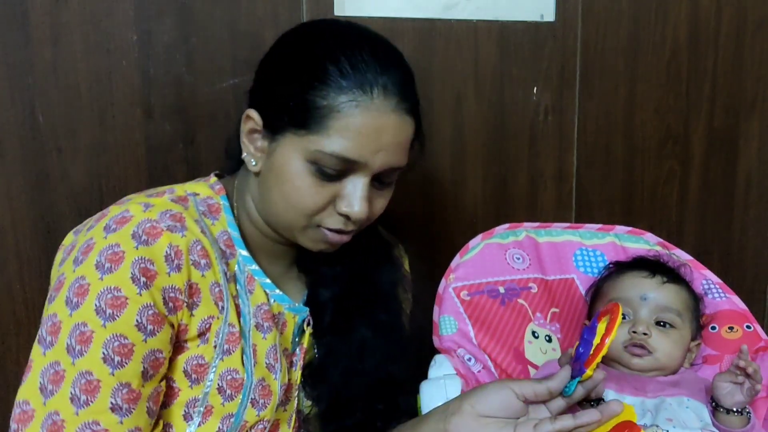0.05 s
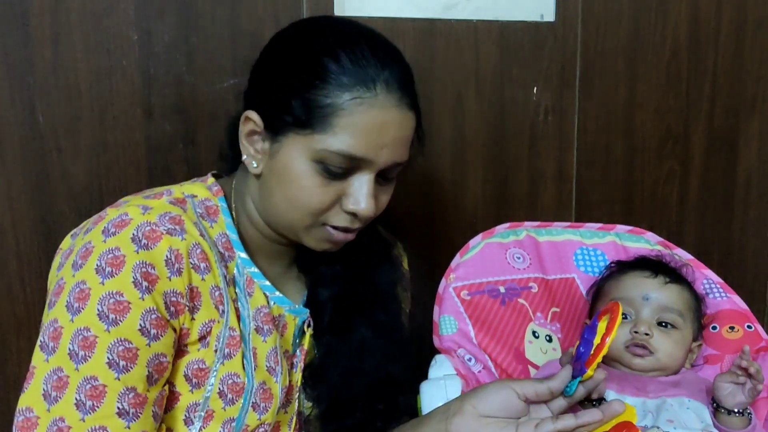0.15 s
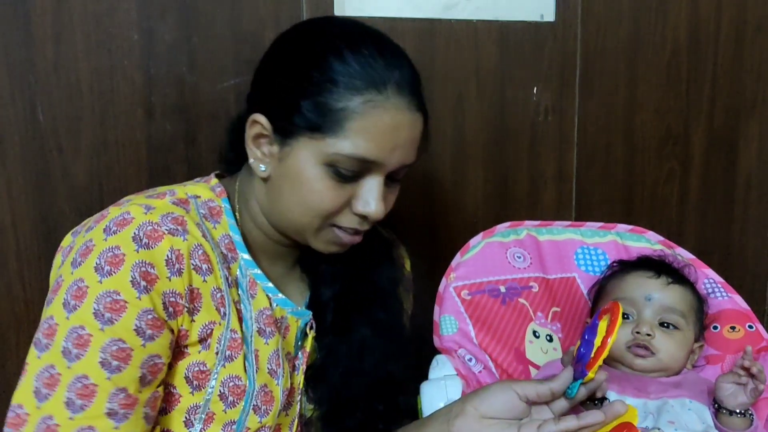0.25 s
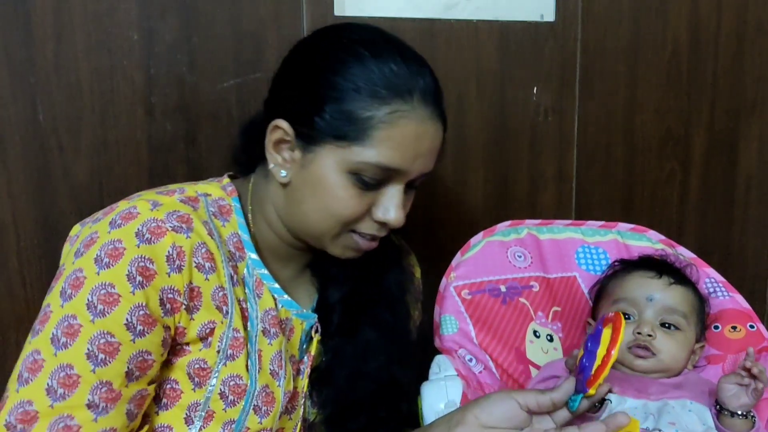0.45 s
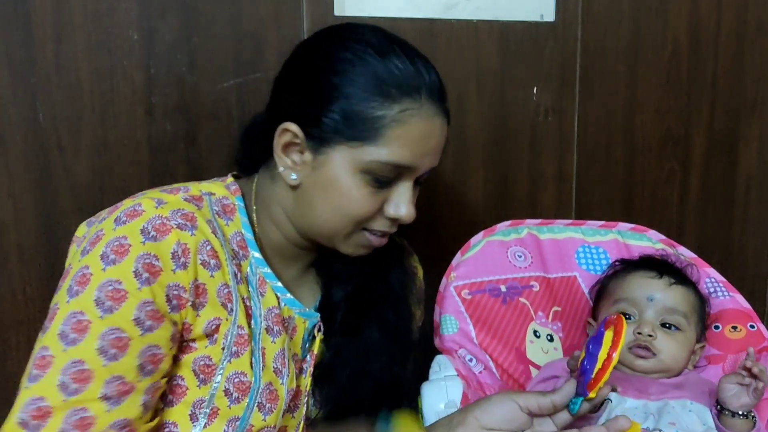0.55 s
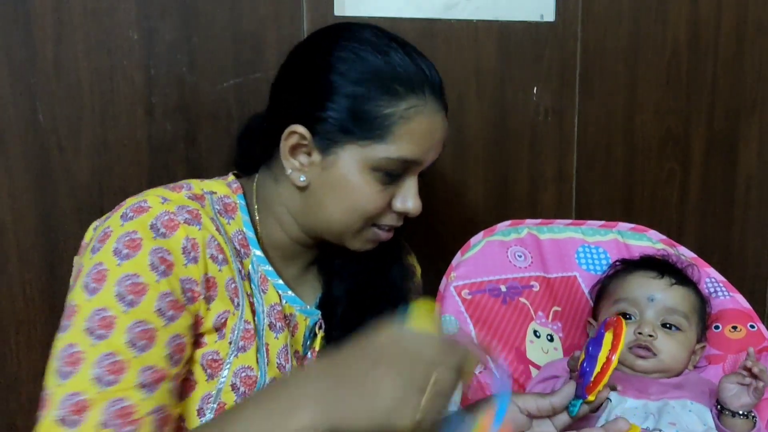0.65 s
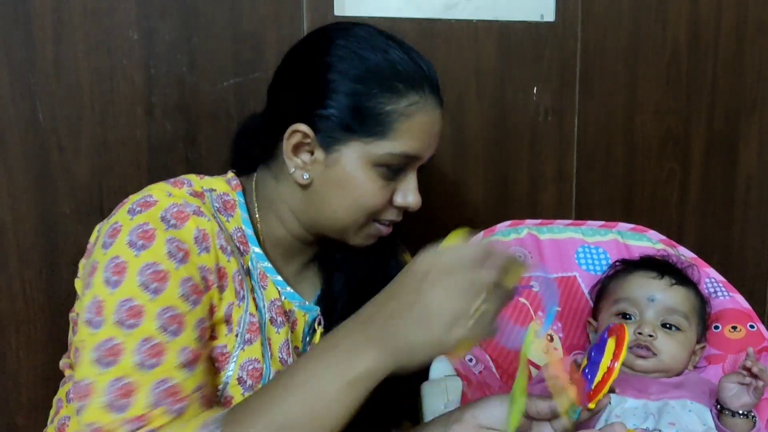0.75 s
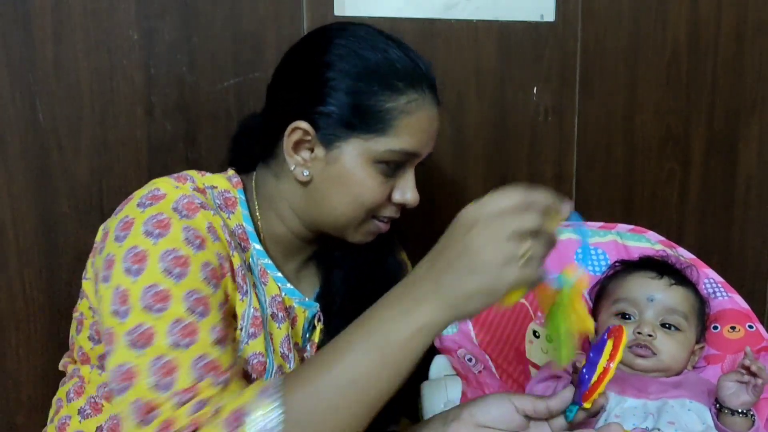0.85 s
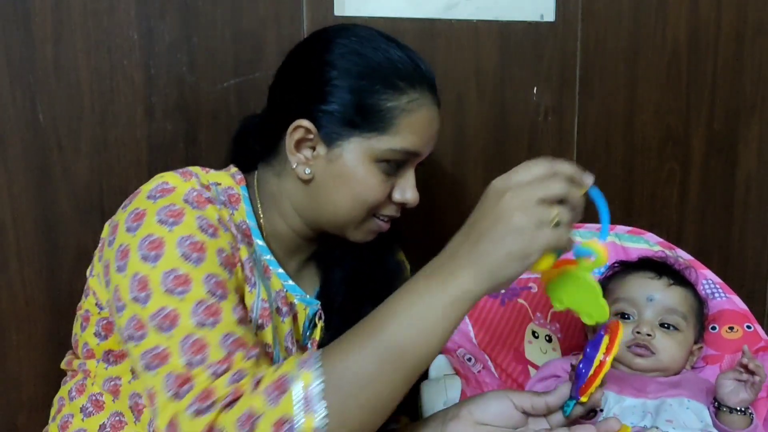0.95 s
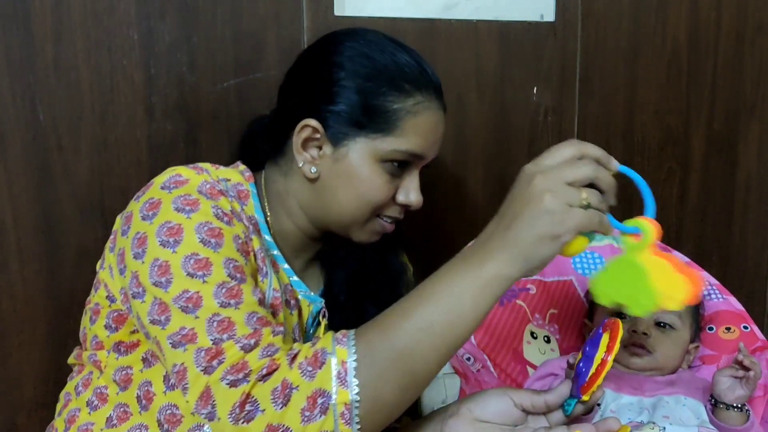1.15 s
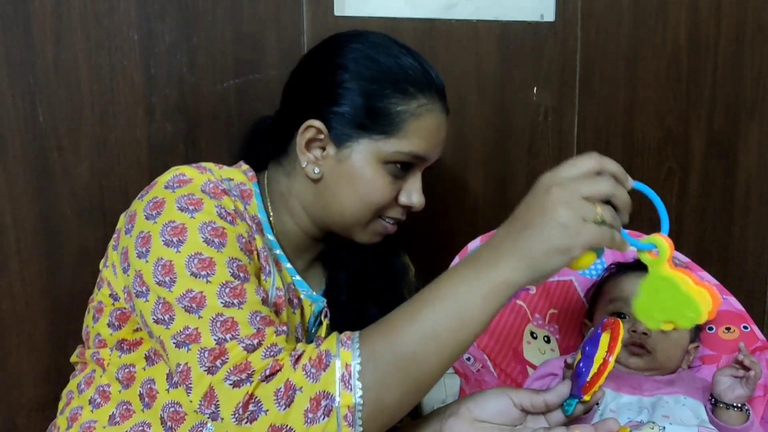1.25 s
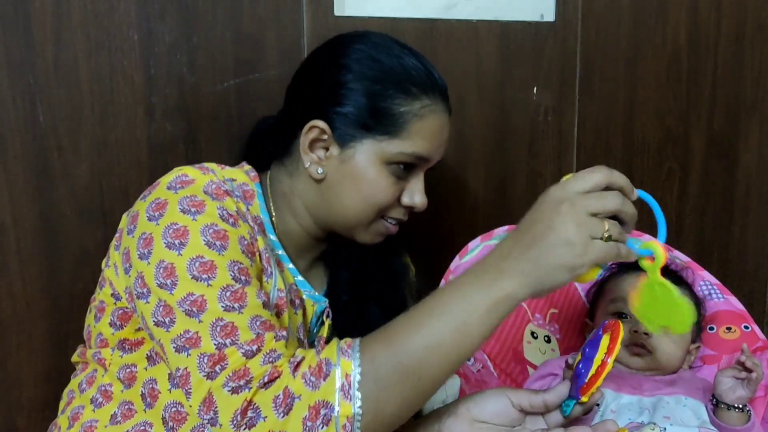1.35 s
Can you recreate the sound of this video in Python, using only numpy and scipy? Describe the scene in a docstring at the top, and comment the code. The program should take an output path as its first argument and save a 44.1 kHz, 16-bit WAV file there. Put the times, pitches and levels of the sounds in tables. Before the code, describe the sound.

Plastic toy keys on a ring are shaken, clacking together over a faint sleeve rustle.

```python
"""A faint steady hum fills a small panelled room, and a sleeve starts to rustle as a baby's rattle,
plastic keys on a ring, is lifted. The keys touch lightly, then are shaken in three bursts.
In the first two they slide and clack against each other; in the third they swing back and knock on
the ring, then settle with two tiny touches. Each hit makes the plastic ring for a moment,
a near wall echoes it and the room rings on."""
import sys
import numpy as np
from scipy import signal
from scipy.fft import rfft, irfft
from scipy.io import wavfile

SR = 44100
rng = np.random.default_rng(int(sys.argv[2]) if len(sys.argv) > 2 else 0)


def wav_out(sig):
    """Save sig, one row per channel (or a flat mono array), as 16-bit PCM at SR to the path in sys.argv[1]."""
    wavfile.write(sys.argv[1], SR, np.round(np.clip(np.atleast_2d(sig).T, -1, 1) * 32767).astype(np.int16))


N = 61739

# Levels are relative. A ring time is how long a sound takes to fade by 60 dB.
# tones of the hum: f/Hz, level/dB
HUM_TONES = [(429, -54.5), (284, -69)]
# tone colour of the still room air: f/Hz, level/dB
AIR_COLOUR = [(25, -16.5), (50, -11.5), (70, -6), (110, -2.5), (180, -4), (290, 5), (500, -7), (800, -3.5),
              (1500, -20), (3000, -31.5), (6000, -30), (10000, -34.5), (15000, -35.5)]
# loudness of the sleeve's rustle: t/s, level/dB
SLEEVE_LEVEL = [(0, -60.5), (.15, -53), (.28, -42.5), (.41, -38.5), (.47, -50), (.52, -40), (.57, -50.5),
                (.68, -45.5), (.79, -48), (.9, -54.5), (1.01, -54.5), (1.06, -43), (1.16, -47.5),
                (1.25, -54), (1.35, -65), (1.39, -55.5)]
# tone colour of the rustle: f/Hz, level/dB
SLEEVE_COLOUR = [(40, -22), (100, -15.5), (180, -1), (290, -0.5), (420, 0), (600, -3), (1000, -7.5),
                 (2000, -11), (6000, -22), (15000, -51.5)]
# loudness of a low hollow sound stirred by the movement: t/s, level/dB
HOLLOW_LEVEL = [(.1, -65), (.27, -42.5), (.42, -48.5), (.5, -46.5), (.62, -73), (.72, -57), (.80, -44.5),
                (.88, -71), (1.02, -58.5), (1.15, -53), (1.33, -79.5), (1.39, -52)]
# tone colour of the hollow sound: f/Hz, level/dB
HOLLOW_COLOUR = [(150, -21), (245, -13.5), (280, 5.5), (315, -12), (500, -36.5)]
# light touches of the keys: t/s, level/dB, f/Hz, ring time/s
TOUCHES = [(0.101, -37, 5050, .25), (0.124, -36, 7384, 0.017), (0.854, -30, 2450, 0.011),
           (0.925, -38.5, 3160, 0.079), (1.379, -35.5, 5600, .004), (1.387, -41.5, 5800, 0.0032)]
# natural tones of a key's flat face: f/Hz, level/dB, ring time/s
FACE_TONES = [(4277, 1.5, 0.013), (4420, 0, 0.007), (6086, 1.5, 0.019), (6445, 5, 0.0062), (6986, -1, .012),
              (7390, -2, 0.02)]
# gaps where the face hardly sounds: f/Hz, width/Hz
FACE_GAPS = [(3650, 440), (5370, 230)]
# natural tones of a key's edge: f/Hz, level/dB, ring time/s
EDGE_TONES = [(8580, 3, 0.0055), (8900, 5.5, 0.012), (9790, 9, 0.0057), (10850, -9, 0.0039),
              (11700, -2.5, 0.0061), (13370, -2.5, 0.0072), (14370, -12.5, 0.0084)]
# how long the room rings: f/Hz, ring time/s
ROOM_RING_TIMES = [(500, 0.22), (2500, 0.3), (6500, 0.28), (10000, 0.26), (15000, 0.19)]
# loudness of keys sliding over each other: t/s, level/dB
SLIDING_LEVEL = [(.09, -96), (.125, -50), (.17, -85), (.22, -40.5), (.30, -34), (.40, -32.5), (.46, -63),
                 (.50, -36.5), (0.539, -32), (0.609, -31.5), (.645, -25.5), (.68, -28), (.755, -38.5),
                 (.79, -85), (.91, -53.5), (.99, -62.5), (1.116, -41.5), (1.14, -60), (1.25, -81.5)]
# loudness of one key kept ringing by the sliding: t/s, level/dB
RINGING_LEVEL = [(.23, -90), (.28, -49), (.48, -65.5), (.54, -35), (.60, -37), (.70, -37), (.76, -44.5),
                 (.80, -90)]
# key against key: t/s, bending f/Hz, bending level/dB, face level/dB, edge level/dB,
# wall echo level/dB, direct sound level/dB
CLACKS = [(0.1877, 5440, -30, -25.5, -34, -7, 2), (0.2135, 2560, -12.5, -13, -7, -9.5, 0),
          (0.2317, 2527, -10.5, -11.5, -4, -6.5, -1), (0.2554, 2510, -14, -7, -1, -11, -3),
          (0.2721, 4390, -14, -4.5, -13.5, -22, 2.5), (0.2958, 4410, -14, -2, -5.5, -1.5, 2),
          (0.3068, 4170, -8, -11, -17, -0.5, -2.5), (0.3119, 1850, -17.5, -1, -18, -2.5, 1.5),
          (0.3398, 2380, -9, -11.5, -6.5, -12, -8.5), (0.3637, 2555, -13.5, -5.5, -8, -11, 0),
          (0.3705, 2935, -9, -8.5, -8.5, -21, 0.5), (0.406, 1946, -18.5, -18.5, -18, -3.5, 0.5),
          (0.4403, 4390, -39, -21.5, -22.5, -1, 6), (0.5032, 2040, -13, -7.5, -14, -3, 6),
          (0.5247, 4433, -1, -4.5, -4, -21.5, 1.5), (0.5325, 4480, -6.5, -15, 1, -16, -1),
          (0.592, 1680, -13.5, -7.5, -7.5, -16.5, -1.5), (0.5918, 3267, -12.5, -22, -12.5, -7, -1.5),
          (0.6047, 1570, -15.5, -1.5, -19, -9.5, 2.5), (0.6126, 2940, -13.5, -4.5, -7.5, -18, 2.5),
          (0.6816, 2120, -15.5, -5.5, -9, -19, 5.5), (0.6818, 3140, -13, -20, -16, -18, 3.5),
          (0.683, 4350, -7, -15, 0, -18, 4), (1.0962, 7450, -9.5, -15, -18, -5.5, 0.5)]
# loudness of the keys jostling on the ring: t/s, level/dB
JOSTLE_LEVEL = [(1.015, -110), (1.035, -32), (1.085, -37.5), (1.12, -48), (1.17, -100)]
# keys swinging back on the ring: t/s, level/dB, treble lift/(dB per octave)
KNOCKS = [(1.0263, -7, 7.5), (1.034, -10.5, 10), (1.038, -4.5, -11), (1.041, -0.5, -1.5), (1.051, -12, -14),
          (1.071, -3.5, -1), (1.087, -17.5, -3)]
# natural tones of the ring with the keys hanging on it: f/Hz, level/dB, ring time/s
RING_TONES = [(1840, -3.5, 0.022), (2123, -4, .012), (2354, -4.5, 0.015), (2920, -1, 0.015),
              (3850, -2.5, .011), (4400, -4.5, 0.023), (5000, 0, 0.0061), (6180, 0.5, 0.013),
              (7270, -3.5, 0.012), (8900, -8, .0041), (10700, -17, 0.01)]

RATTLE_DB, KNOCK_DB, AIR_DB = 4, -0.5, -56.5
BEND_RING_S, BEND_SPACING, BEND_WIDTH_HZ = 0.012, 0.062, 1170
SNAP_DB, SNAP_RING_S = -7, 0.009
WALL_DELAY_S, ROOM_DB, ROOM_GAP_S, ROOM_BUILD_S = 0.0073, -3.5, 0.0026, 0.0045
TICKS_PER_S, TICK_SCATTER_DB = 1300, 3


def gain(db):
    """Turn decibels into a number to multiply by."""
    return 10 ** (np.asarray(db) / 20)


def unit(x):
    """Scale a sound so that its energy is 1."""
    return x / np.sqrt(np.sum(x ** 2))


def fade(t, ring_s):
    """A smooth fade, 60 dB down after ring_s."""
    return np.exp(-np.log(1000) * t / max(ring_s, 1e-4))


def loudness(curve):
    """Join (t/s, level/dB) points into one gain per sample."""
    return gain(np.interp(np.arange(N) / SR, *np.array(curve).T))


def add(out, at, x):
    """Mix x into out, starting at a time in seconds."""
    i = int(np.clip(at * SR, 0, N - 1))
    out[i:i + len(x)] += x[:N - i]


def filtered(x, kind, hz, order):
    """Keep what is above hz ("high"), keep a band ("band") or remove one ("stop")."""
    return signal.sosfilt(signal.butter(order, hz, kind, fs=SR, output="sos"), x)


def noise(colour):
    """Steady noise with a tone colour of (f/Hz, level/dB) points."""
    hz, db = np.array(colour).T
    f = np.maximum(np.arange(N // 2 + 1) * SR / N, 1)
    shape = gain(np.interp(np.log(f), np.log(hz), db))
    x = irfft(rfft(rng.standard_normal(N)) * shape, N)
    return x / x.std()


def background():
    """A sleeve rustles and a hollow sound swells and fades, over a steady hum and room air."""
    t = np.arange(N) / SR
    sleeve = noise(SLEEVE_COLOUR) * loudness(SLEEVE_LEVEL)
    hollow = noise(HOLLOW_COLOUR) * loudness(HOLLOW_LEVEL)
    hum = sum(np.sqrt(2) * gain(db) * np.sin(2 * np.pi * (hz * t + rng.random())) for hz, db in HUM_TONES)
    return sleeve + hollow + hum + gain(AIR_DB) * noise(AIR_COLOUR)


def touches():
    """Keys touch lightly: one fading tone on top of a small click."""
    out = np.zeros(N)
    for at, db, hz, ring_s in TOUCHES:
        touch = strike([(hz, 0, ring_s)], scatter=0, size=8192)
        click = gain(0.5) * key_bend(hz) + gain(-2.5) * key_face() + gain(-25) * strike(EDGE_TONES)
        add(touch, 0, click)
        add(out, at, room(gain(db) * touch))
    return out


def strike(tones, lift_db=0, scatter=0.024908, size=2048):
    """Struck plastic rings briefly at its natural tones; scatter shifts their pitch at each hit."""
    t = np.arange(size) / SR
    lowest_hz = tones[0][0]
    out = 0
    for (hz, db, ring_s), (detune, phase) in zip(tones, rng.standard_normal((len(tones), 2))):
        tone = np.sin(2 * np.pi * (hz * (1 + scatter * detune) * t + phase)) * fade(t, ring_s)
        out = out + unit(tone) * gain(db + lift_db * np.log2(hz / lowest_hz))
    return unit(filtered(out, "high", 0.78 * lowest_hz, order=6))  # little sound below the lowest tone


def key_bend(hz):
    """A key bends to and fro, giving five close tones in a narrow band around hz."""
    tones = [(hz * (1 + k * BEND_SPACING), 0, BEND_RING_S) for k in range(-2, 3)]
    band = [hz - BEND_WIDTH_HZ / 2, hz + BEND_WIDTH_HZ / 2]
    return unit(filtered(strike(tones, scatter=0.013), "band", band, order=6))


def key_face():
    """The flat of a key snaps and rings, with deep gaps between its groups of tones."""
    x = strike(FACE_TONES, lift_db=5.5) + snap(low_hz=4000)
    for hz, width in FACE_GAPS:
        x = filtered(x, "stop", [hz - width / 2, hz + width / 2], order=2)
    return unit(x)


def snap(low_hz, size=2048):
    """The contact itself: a very short burst of noise, weak below low_hz."""
    burst = rng.standard_normal(size) * fade(np.arange(size) / SR, SNAP_RING_S)
    return gain(SNAP_DB) * unit(filtered(burst, "high", low_hz, order=8))


def room(x, wall_db=-10, direct_db=0, size=16384):
    """Direct sound, a wall echo and a fading tail, which is new each time because the toy moves."""
    t = np.arange(size) / SR
    f = np.arange(size // 2 + 1) * SR / size
    hz, ring_times = np.array(ROOM_RING_TIMES).T
    white = rfft(rng.standard_normal(size))
    tail = 0
    for share, ring_s in zip(np.eye(len(hz)), ring_times):  # each band fades at its own speed
        band = irfft(white * np.interp(f, hz, share), size)
        tail = tail + band * fade(t, ring_s)
    build_up = np.clip((t - ROOM_GAP_S) / ROOM_BUILD_S, 0, 1)
    echoes = gain(ROOM_DB) * unit(tail * build_up)
    echoes[0] += gain(direct_db)
    echoes[int(WALL_DELAY_S * SR)] += gain(wall_db)
    return signal.fftconvolve(x, echoes)[:N]


def chatter():
    """Sliding keys tick on their faces, keep one key ringing, and later jostle on the ring."""
    sliding = ticking(SLIDING_LEVEL,
                      lambda: unit(key_face() + gain(-8.5) * strike(EDGE_TONES) + snap(low_hz=2750)))
    ringing = ticking(RINGING_LEVEL, lambda: key_bend(hz=4433))
    jostling = ticking(JOSTLE_LEVEL, ring_hit)
    return sliding + ringing + jostling


def ticking(curve, make_tick, spots=10):
    """Many tiny ticks at random times, from several contact spots, following a loudness curve."""
    level = loudness(curve)
    out, chance = 0, TICKS_PER_S / SR
    for _ in range(spots):
        hits = rng.random(N) < chance / spots
        strength = gain(TICK_SCATTER_DB * rng.standard_normal(N))
        out = out + signal.fftconvolve(hits * strength * level, room(make_tick()))[:N]
    return out / np.sqrt(chance)


def clacks():
    """Key hits key: it bends and snaps, and its face and edge ring."""
    out = np.zeros(N)
    for at, hz, bend_db, face_db, edge_db, wall_db, direct_db in CLACKS:
        snap_boost_db = 10 + 0.72 * face_db  # harder blows snap more
        clack = gain(bend_db) * (key_bend(hz) + gain(snap_boost_db) * snap(0.68 * hz))
        clack += gain(face_db) * key_face() + gain(edge_db) * strike(EDGE_TONES)
        loose = np.clip(-face_db / 16, 0, 1)  # lighter clacks skid more
        add(out, at, room(skid(clack, span_s=0.0013, loose=loose), wall_db, direct_db))
    return out


def skid(x, span_s, loose=1, repeats=4):
    """A loose contact: one firm hit, then several weaker ones right after it."""
    out = np.concatenate([x, np.zeros(len(x))])
    for delay, strength in rng.random((repeats, 2)):
        add(out, delay * span_s, loose * strength * x)
    return unit(out) * np.linalg.norm(x)


def ring_hit(lift_db=0):
    """A hanging key meets the ring: the ring's tones and a snap."""
    return strike(RING_TONES, lift_db, scatter=0.046) + gain(0.5) * snap(low_hz=480)


def knocks():
    """The keys swing back and knock on the ring, skidding as they land."""
    out = np.zeros(N)
    for at, db, lift_db in KNOCKS:
        knock = gain(db + KNOCK_DB) * skid(ring_hit(lift_db), span_s=0.003)
        add(out, at, room(knock, wall_db=-14))
    return out


def scene():
    """The rattle's separate hits and fine chatter over the quiet background, in one channel."""
    hits = gain(RATTLE_DB) * (clacks() + knocks() + touches())
    return (hits + chatter() + background())[None]


def record(dry):
    """Cut off the very highest treble."""
    top_hz = 15450
    return signal.sosfilt(signal.ellip(10, .2, 70, top_hz, fs=SR, output="sos"), dry)


dry = scene()
out = record(dry)
wav_out(out)
```